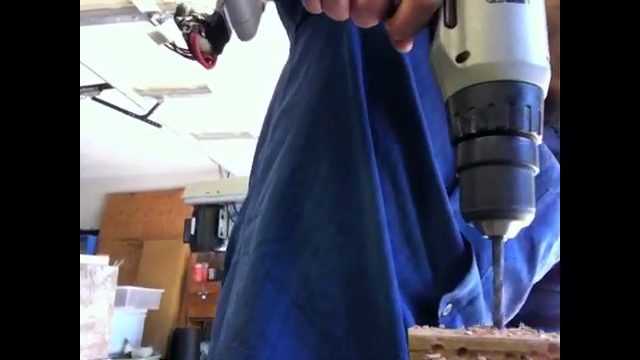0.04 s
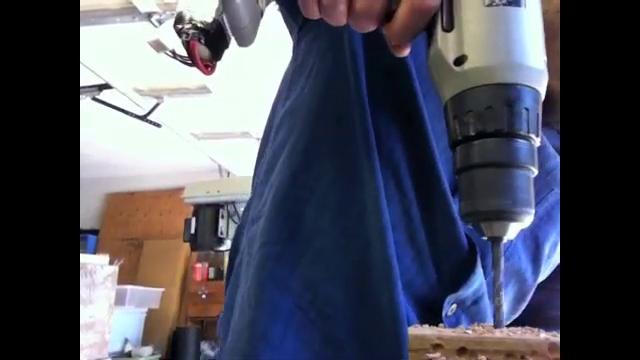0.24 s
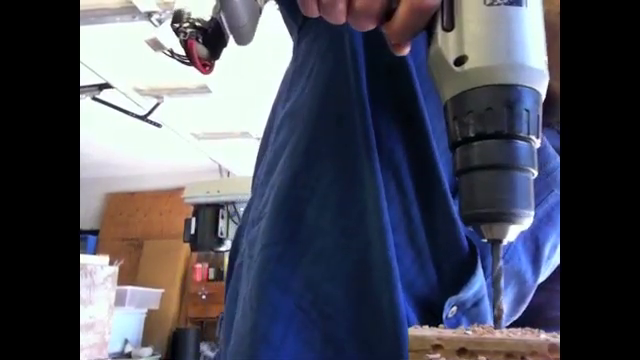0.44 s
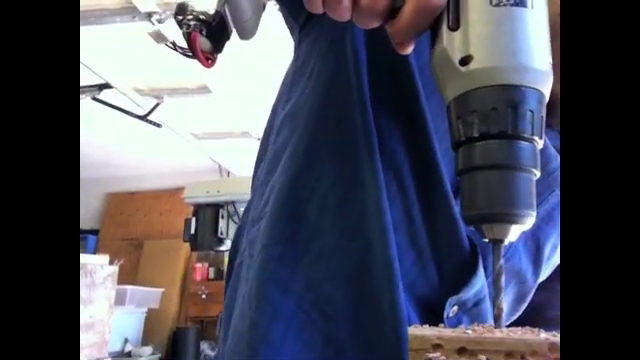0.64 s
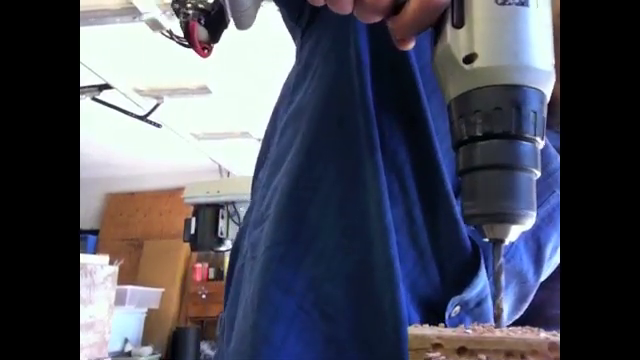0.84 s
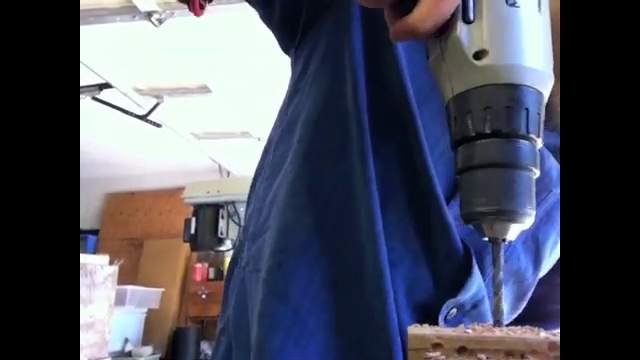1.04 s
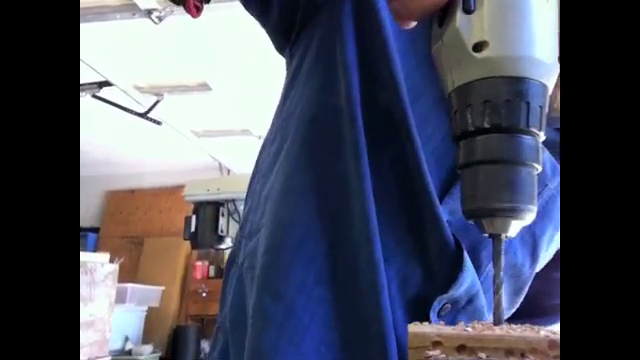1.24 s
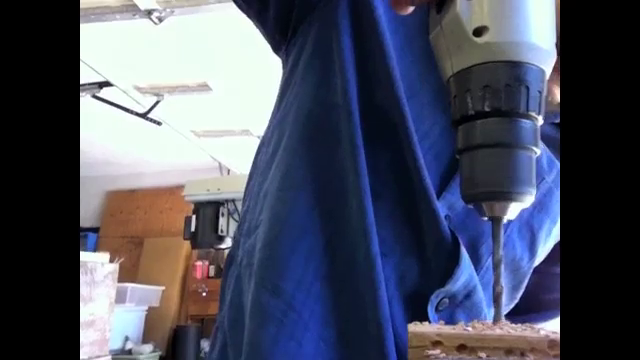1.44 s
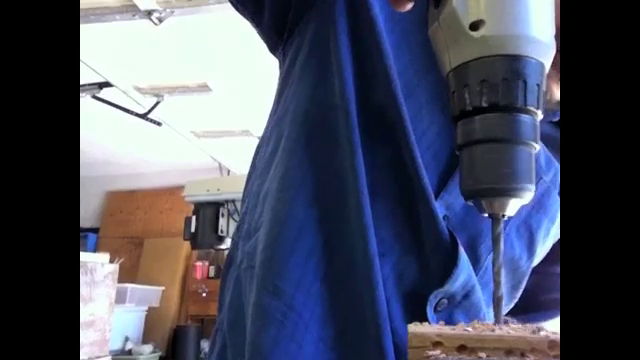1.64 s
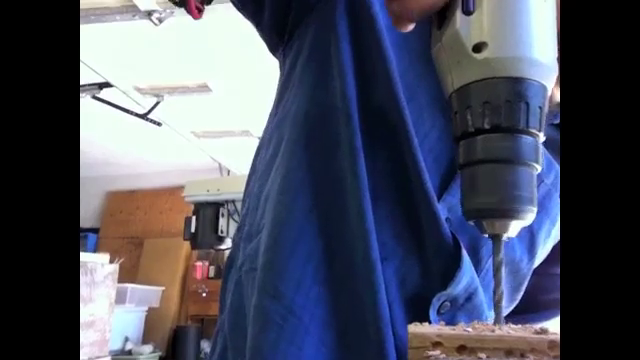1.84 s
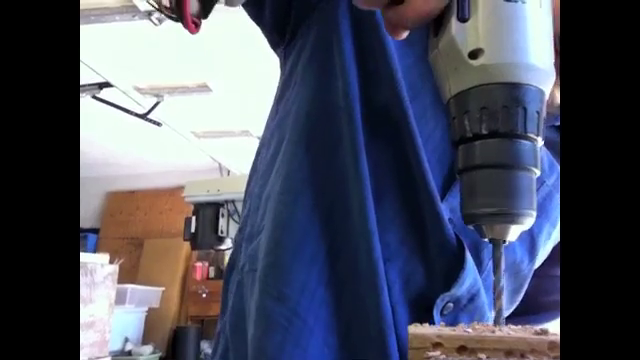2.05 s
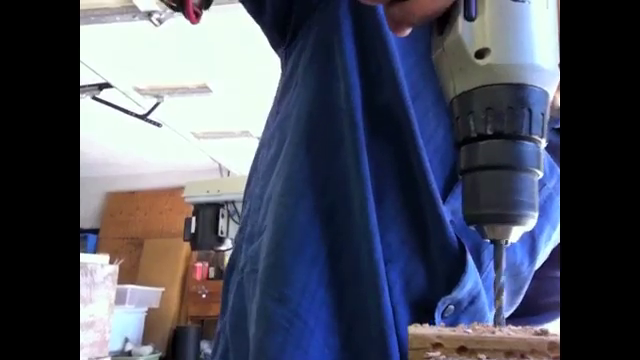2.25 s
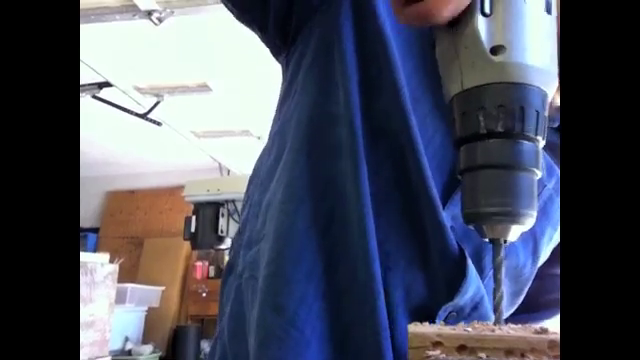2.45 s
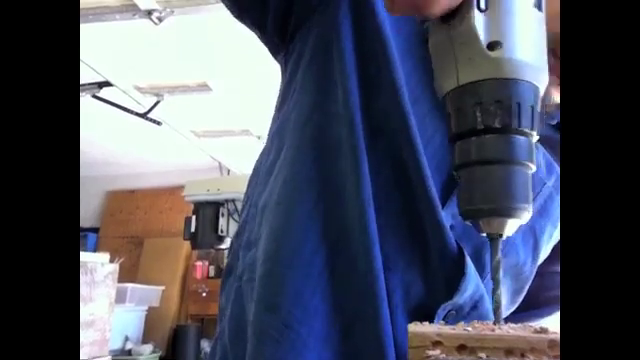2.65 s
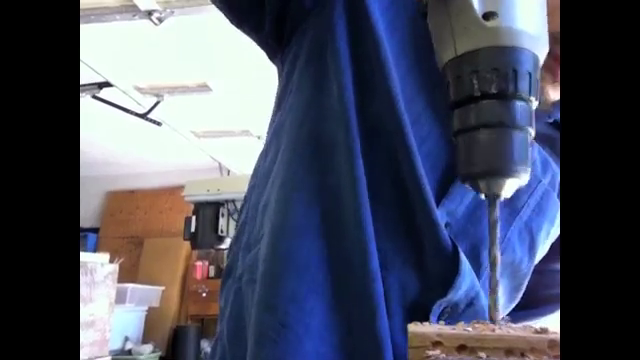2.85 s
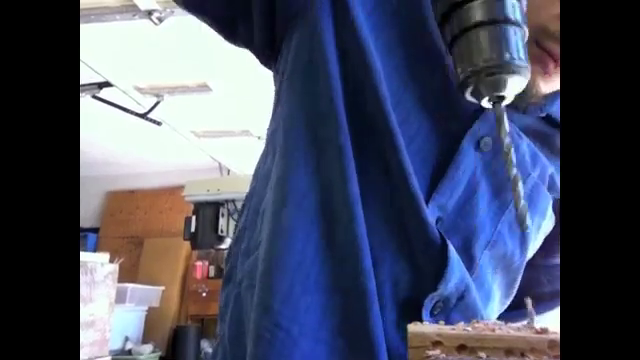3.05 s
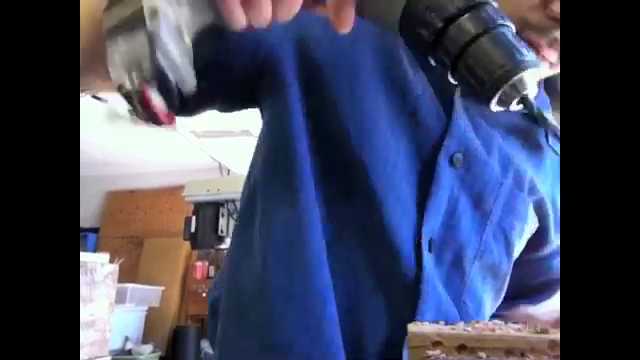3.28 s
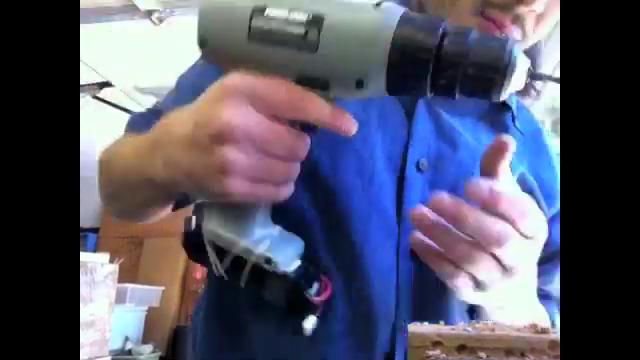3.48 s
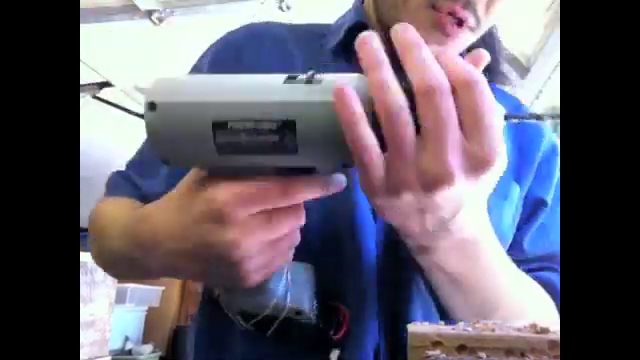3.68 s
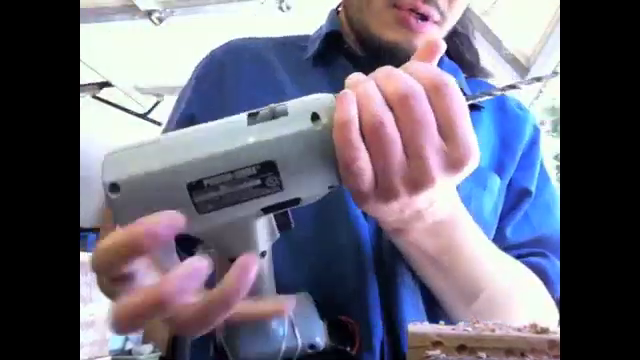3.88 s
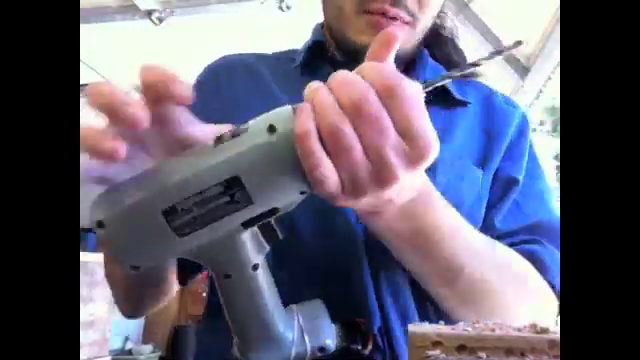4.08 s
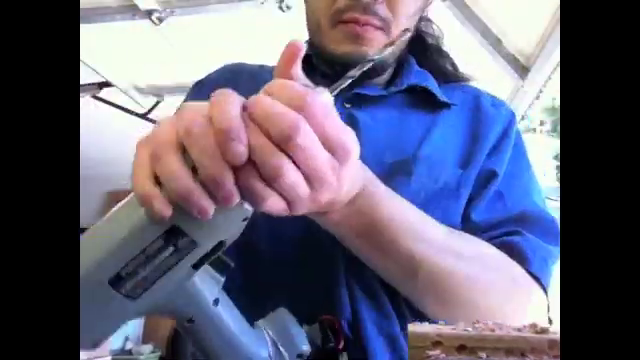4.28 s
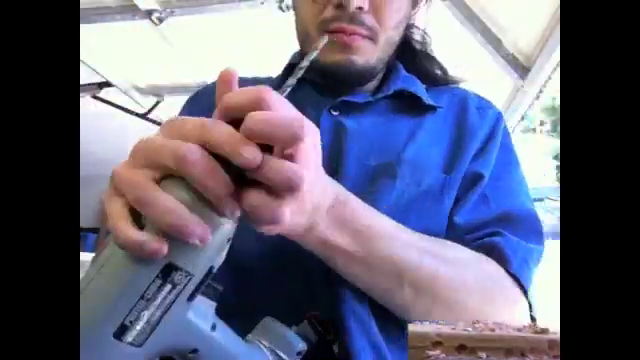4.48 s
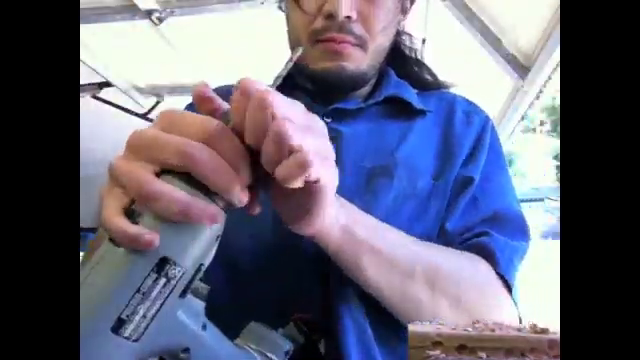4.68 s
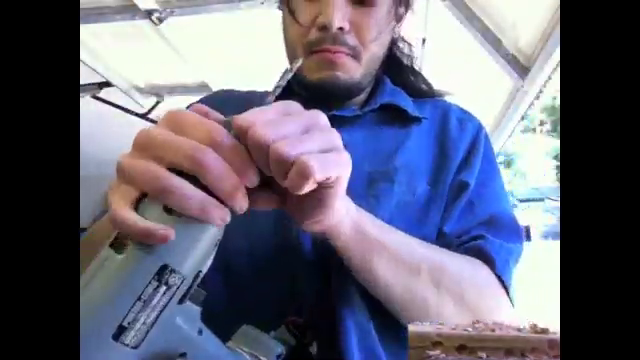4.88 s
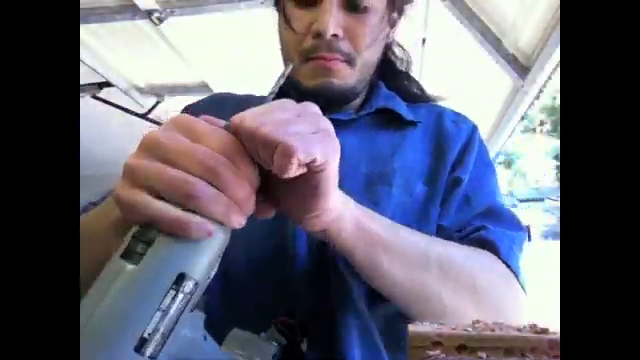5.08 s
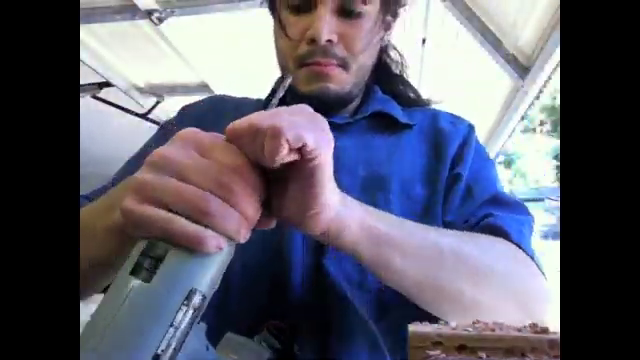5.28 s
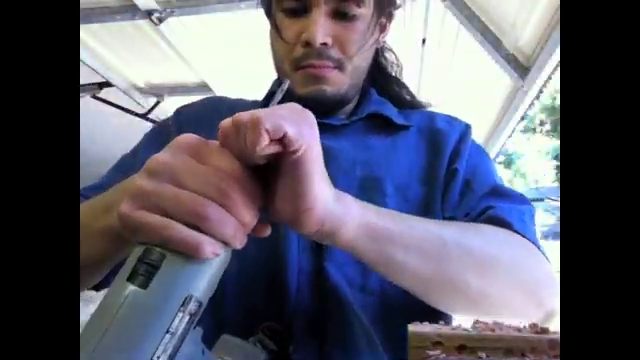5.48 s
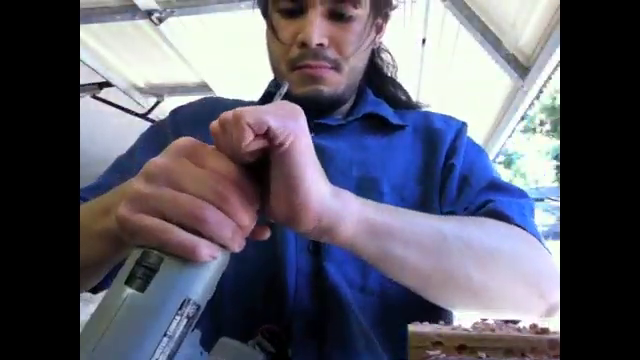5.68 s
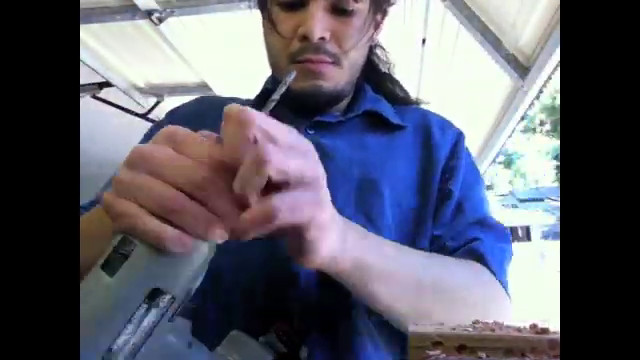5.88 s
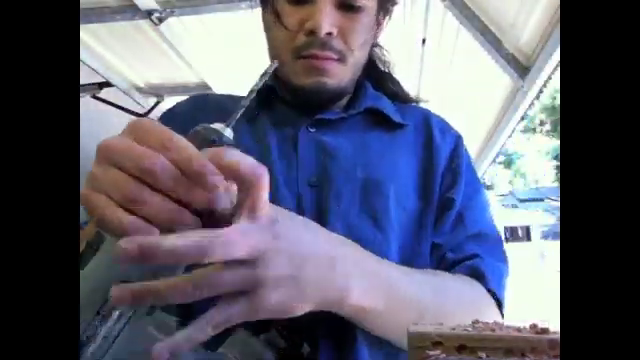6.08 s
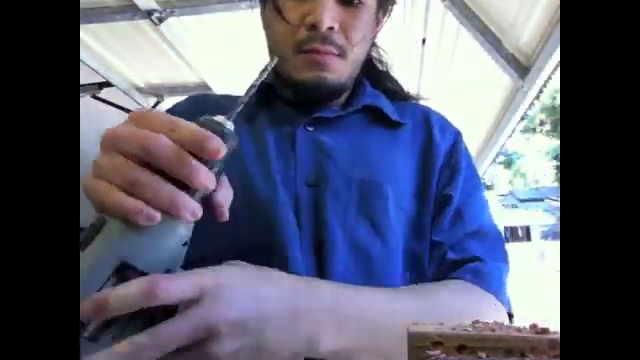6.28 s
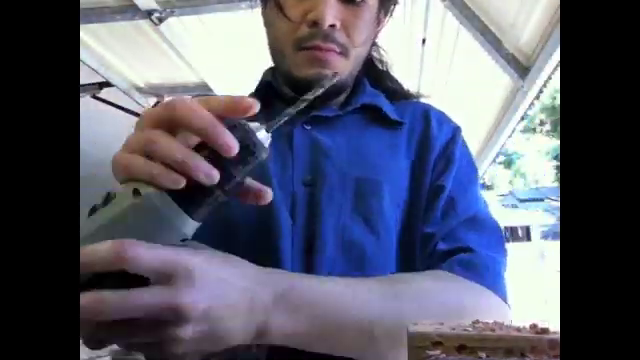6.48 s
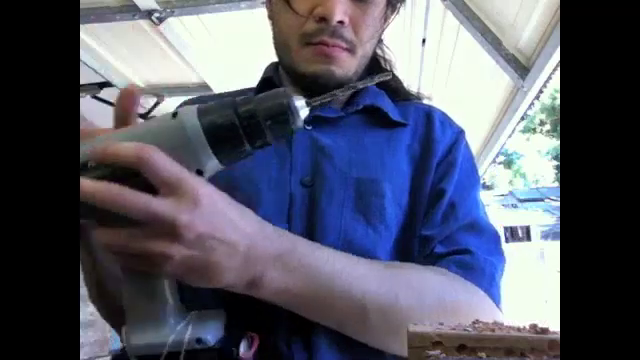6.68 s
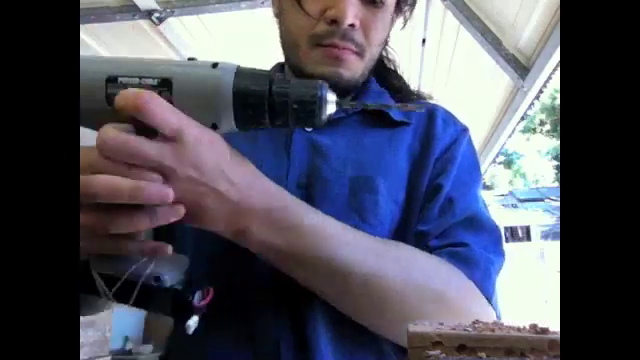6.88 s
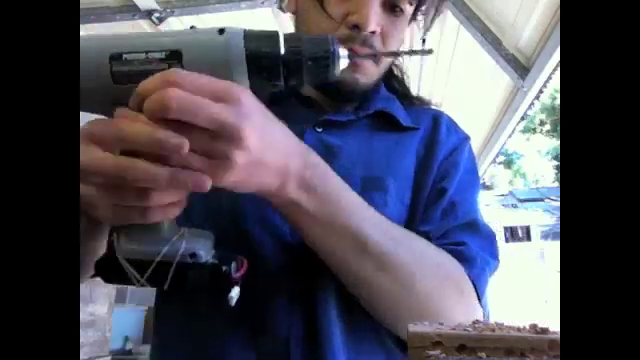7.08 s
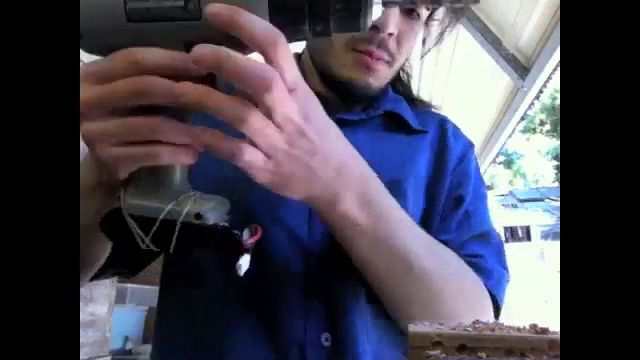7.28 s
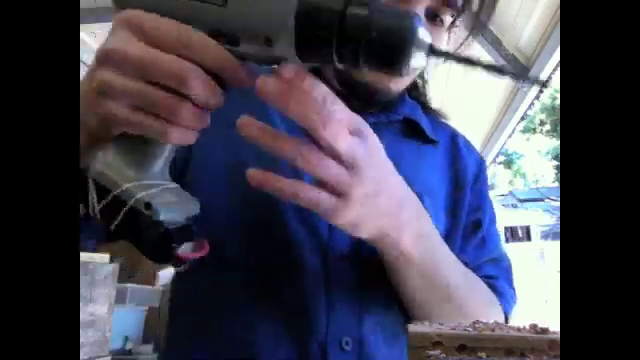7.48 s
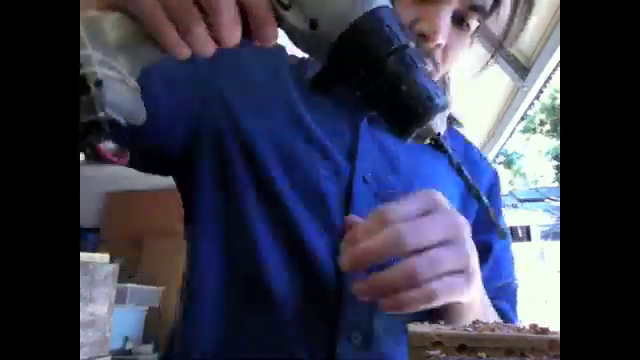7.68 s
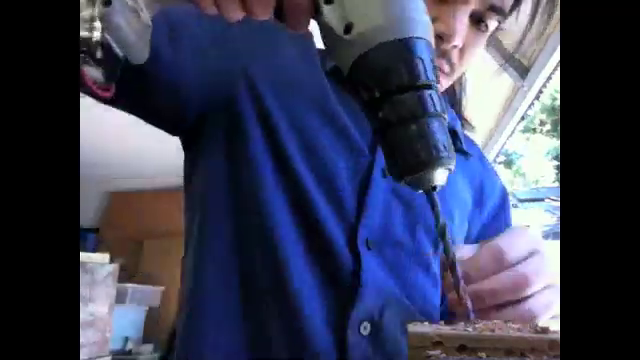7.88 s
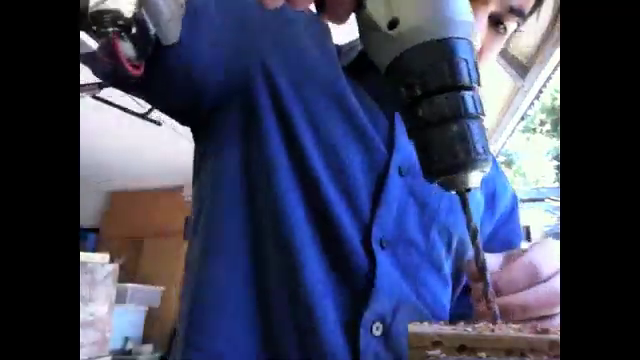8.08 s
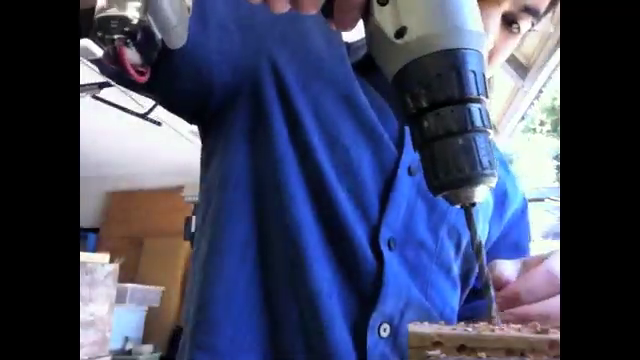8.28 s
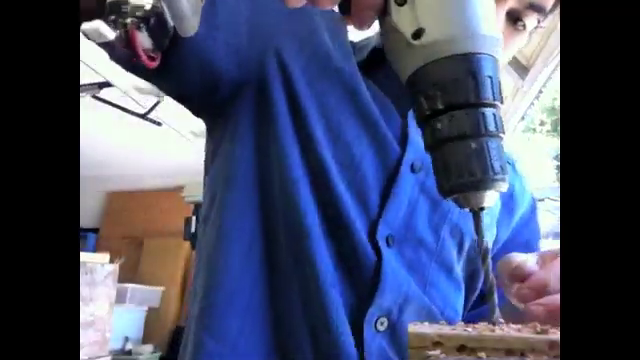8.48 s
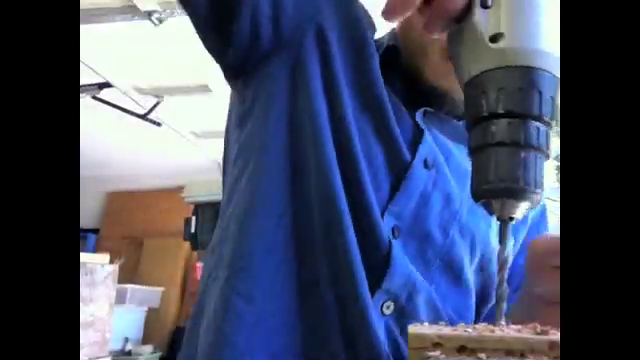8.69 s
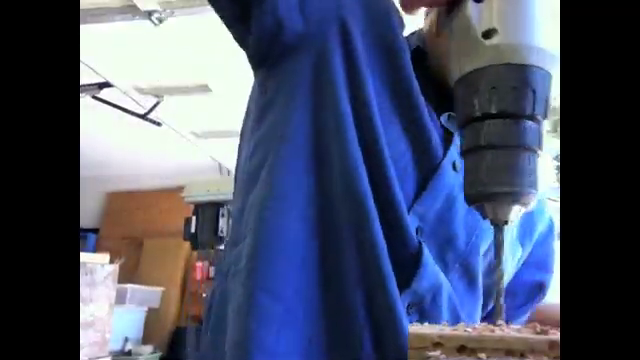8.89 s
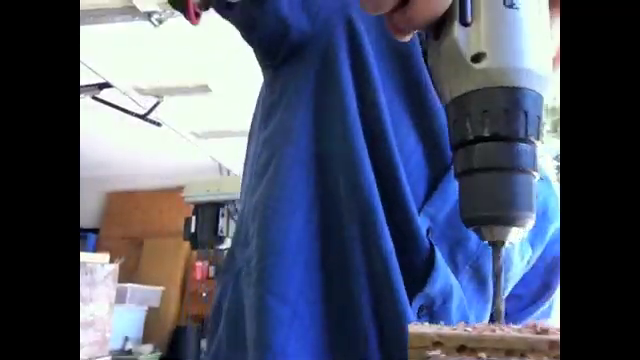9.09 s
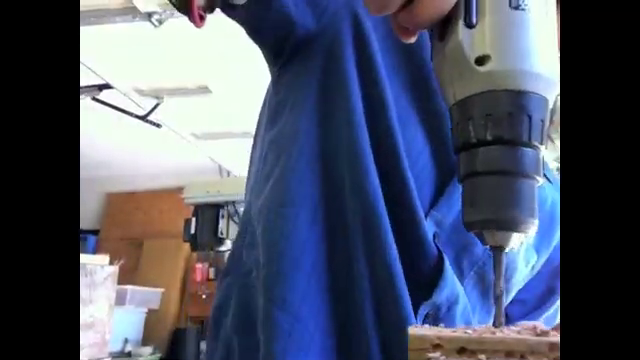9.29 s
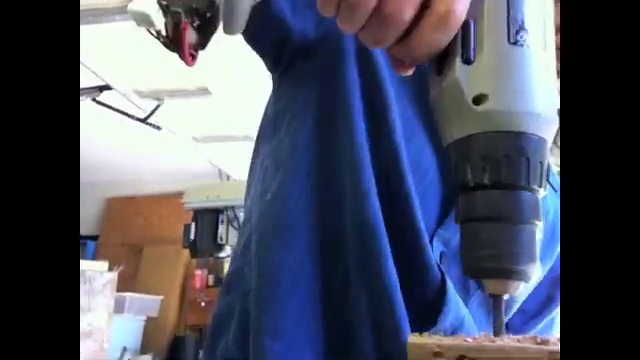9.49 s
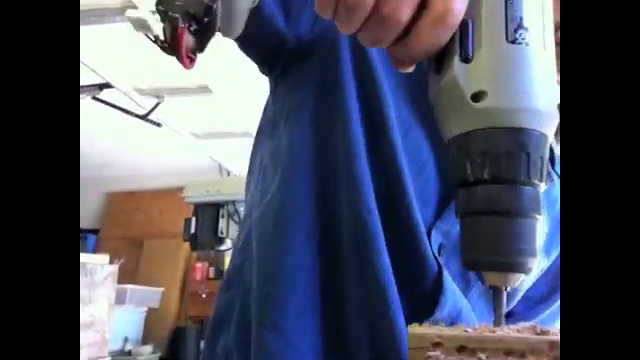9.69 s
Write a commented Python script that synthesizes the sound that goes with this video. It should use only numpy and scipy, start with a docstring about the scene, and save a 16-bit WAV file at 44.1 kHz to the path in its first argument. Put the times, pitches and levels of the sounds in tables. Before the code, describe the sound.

A cordless drill whines through wood, coasts to a stop, is handled with small clicks, then restarts with squeals and sharp cracks.

```python
"""A cordless drill bores into a wooden block, close by in a workshop. Tooth impacts and tones locked
to the shaft excite the resonances of its plastic casing, so the gearbox rattles and whines.
The trigger is eased, pulled again and let go, and the motor coasts down against drag and friction.
Hands turn the drill over; the casing clicks and the chuck clacks. Then it starts again: the bit
squeals by stick-slip friction and catches with a few sharp cracks that jolt the block on the bench."""
import sys
import numpy as np
from scipy import signal
from scipy.fft import rfft, irfft, next_fast_len
from scipy.io import wavfile
from scipy.ndimage import uniform_filter1d

SR = 44100
rng = np.random.default_rng(int(sys.argv[2]) if len(sys.argv) > 2 else 0)


def output_pcm(signal):
    """Save a mono or channel-first signal as 16-bit PCM at the path in sys.argv[1].

    Samples are clipped to [-1, 1] before scaling.
    """
    pcm = np.clip(np.atleast_2d(signal).T, -1, 1) * 32767
    wavfile.write(sys.argv[1], SR, np.round(pcm).astype(np.int16))


N = 429534
TIME = np.arange(N) / SR
FULL_SPEED_HZ = 278  # motor turns per second
CARRIER_RATIO = .2147  # turns of the planet carrier per motor turn
BITE_S = .035  # time for the bit to take hold or come free

# resonances and dips of the plastic casing: hz, width_hz, lift_db
CASING_MODES = [(602.5, 18, 6.5), (793, 150, 5), (995, 350, -2.5), (1116, 110, 5), (1424, 190, 8),
                (1805, 260, 4.5), (2340, 91, -0.5), (2610, 200, -4.5), (3220, 68, -3.5), (3530, 110, -5),
                (3670, 350, 3), (4640, 180, 6.5), (4680, 47, -9), (5900, 40, -2), (6047, 350, 5.5),
                (7240, 420, 3.5)]
# trigger pulls: pulled_s, let_go_s, spin_up_s (time constant), slack_ring_db
TRIGGER_PULLS = [(-1, .972, .06, 0), (1.344, 2.432, .042, -2), (8.955, 10.5, .055, 5)]
# speed that the motor settles to under power: time_s, speed_hz
DRIVEN_SPEED = [(0, 281), (.13, 278.3), (.98, 277.8), (1.45, 291), (1.55, 291), (1.78, 302), (2.05, 292),
                (2.2, 276), (2.45, 275.5), (9.1, 278), (9.25, 288), (9.4, 291), (9.52, 276), (9.6, 290),
                (9.73, 295)]
# load on the gears, relative to full load: time_s, load_db
GEAR_LOAD = [(0, -1), (.1, -0.5), (.9, -0.44), (1.05, -1), (1.3, -7.5), (1.46, -5), (1.75, -9.5), (1.9, -6),
             (2.2, -2), (2.56, -0.5), (2.62, -4), (2.72, -1.5), (3.3, -2), (9.02, -8), (9.15, -4),
             (9.44, -3), (9.56, -6), (9.74, -10)]
# the bit bites into the wood: start_s, end_s, depth (0-1), song_db, song_roughness (0-1), howl_db
CUTS = [(-1, 1.02, 1, -41.5, .2, -43), (2.17, 2.53, .85, -43.5, .6, -58)]


def from_db(db):
    """Decibels to amplitude ratio."""
    return np.exp(np.asarray(db) * (np.log(10) / 20))


def rms_one(x):
    """Normalisation to unit power."""
    return x / np.sqrt(np.mean(x ** 2) + 1e-20)


def in_time(curve):
    """Linear interpolation of (time_s, value) rows at every sample."""
    return np.interp(TIME, *np.transpose(curve))


def between(start_s, end_s, edge_s):
    """A soft-edged gate: 1 between two times, 0 outside."""
    return .5 * (np.tanh((TIME - start_s) / edge_s) - np.tanh((TIME - end_s) / edge_s))


def bell_curve(centre_s, half_width_s):
    """A Gaussian envelope, 10 dB down at half_width_s from its centre."""
    return from_db(-10 * np.minimum(((TIME - centre_s) / half_width_s) ** 2, 20))


def drift(rate_hz):
    """Random modulation of unit variance, with rate_hz new values a second."""
    knots = rng.standard_normal(N // 32)
    return np.interp(TIME * rate_hz, np.arange(len(knots)), knots * np.sqrt(1.5))


def filtered(x, hz, kind, order=2):
    """Butterworth low- or high-pass."""
    return signal.sosfilt(signal.butter(order, hz, kind, fs=SR, output="sos"), x)


def coloured(x, spectrum):
    """Spectral shaping by a curve of (hz, level_db) rows."""
    hz, db = np.transpose(spectrum)
    size = next_fast_len(N)
    bins_hz = np.maximum(np.fft.rfftfreq(size, 1 / SR), 1)
    gain = from_db(np.interp(np.log(bins_hz), np.log(hz), db))
    return irfft(rfft(x, size) * gain, size)[:N]


def resonate(x, modes):
    """Resonances and antiresonances in series, one peaking filter each."""
    for hz, width_hz, lift_db in modes:
        gain, half_width = from_db(lift_db / 2), np.pi * width_hz / SR
        tuning = -2 * np.cos(2 * np.pi * hz / SR)
        x = signal.lfilter([1 + half_width * gain, tuning, 1 - half_width * gain],
                           [1 + half_width / gain, tuning, 1 - half_width / gain], x + 1e-18)
    return x


def rough_tone(cycles, roughness, flutter_hz, waver_db):
    """Random modulation spreads a share of a tone's power, its roughness, into a narrow noise band."""
    phase = 2 * np.pi * (cycles % 1)
    steady = np.sqrt(2 * (1 - roughness)) * from_db(waver_db * drift(14))
    noise_band = drift(flutter_hz) * np.sin(phase) + drift(flutter_hz) * np.cos(phase)
    return steady * np.sin(phase) + np.sqrt(roughness) * noise_band


def motor_speed():
    """First-order lag: the motor nears its driven speed, then coasts against drag and dry friction."""
    drag_s, friction_hz = .65, 60  # friction brings the exponential decay to a full stop
    driven, speed = in_time(DRIVEN_SPEED), np.zeros(N)
    for pulled_s, let_go_s, spin_up_s, _ in TRIGGER_PULLS:
        lag = (driven - np.interp(pulled_s, TIME, speed)) * np.exp(-np.abs(TIME - pulled_s) / spin_up_s)
        speed = np.where(TIME > pulled_s, np.maximum(driven - lag, 0), speed)
        let_go_hz = np.interp(let_go_s, TIME, speed)
        coast = (let_go_hz + friction_hz) * np.exp(-np.abs(TIME - let_go_s) / drag_s) - friction_hz
        speed = np.where(TIME > let_go_s, np.maximum(coast, 0), speed)
    return speed


def worn_surface(turns, count):
    """Periodic excitation: an uneven surface returns on every turn, giving count equal harmonics."""
    harmonics = np.exp(2j * np.pi * rng.random(count))
    surface = rms_one(irfft(np.append(0, harmonics), 16384))
    return surface[(turns % 1 * len(surface)).astype(int)]


def tooth_force(turns):
    """Gear meshing: nine uneven impacts a turn, plus friction and wear, modulated by the carrier."""
    teeth = np.diff(np.floor(9 * turns + .15 * drift(900)), prepend=0) > 0
    blows = teeth * rng.choice([-1, 1], N) * from_db(5 * np.clip(rng.standard_normal(N), -2, 2))
    blows /= np.sqrt(np.maximum(uniform_filter1d(blows ** 2, size=4000), .08))  # even out the power
    friction = from_db(-1) * rng.standard_normal(N)
    wear = from_db(-7.5) * worn_surface(CARRIER_RATIO * turns, count=240)
    return (blows + friction + wear) * (1 + .098 * np.sin(2 * np.pi * CARRIER_RATIO * turns))


def casing_vibration(force):
    """Forced vibration: the teeth drive the casing, heard as low grind, middle rattle and high hiss."""
    # spectral envelope of the rattle: hz, level_db
    spectrum = [(59, -55), (100, -23), (140, -18.5), (308, -19.5), (492, -11), (991, -14), (1390, -10),
                (1580, -10), (2420, 3), (2690, 1), (7610, -8), (15000, -21), (16000, -32)]
    body = resonate(coloured(force, spectrum), CASING_MODES)
    grind = filtered(filtered(body, 110, "high"), 1090, "low", order=4)
    rattle = filtered(filtered(body, 1250, "high", order=4), 7200, "low", order=4)
    hiss = filtered(body, 7600, "high", order=4)
    return rms_one(grind), rms_one(rattle), rms_one(hiss)


def brush_hiss():
    """Sliding friction at the motor's brushes makes a high band of noise."""
    return rms_one(filtered(filtered(rng.standard_normal(N), 8000, "high"), 14000, "low", order=4))


def shaft_buzz(turns):
    """A harmonic series on the rotation rate, from surface wear, drives the casing."""
    harmonics = filtered(worn_surface(turns, count=22), 900, "high", order=1)
    return rms_one(resonate(harmonics, CASING_MODES))


def gear_whine(turns):
    """Tones locked to the shaft swell as they sweep through resonances; each cut shifts their balance."""
    # motor and gear tones: speed_multiple, roughness (0-1), first_cut_db, second_cut_db, free_db
    shaft_orders = [(1, .1, -36, -22, -37), (1.8, .15, -20, -24, -38), (2, .2, -24, -22, -22),
                    (2.8, .4, -26.5, -26, -33), (3.214, .35, -22, -19, -25), (4, .5, -20.5, -23, -32),
                    (4.21, .45, -22, -21.5, -29), (4.825, .2, -22, -16, -20), (5.19, .2, -26, -20.5, -25),
                    (6, .2, -32, -24, -19), (6.39, .3, -24.5, -30, -29), (7, .35, -23.5, -24, -33),
                    (8.02, .08, -26, -25, -16.5), (8.356, .25, -29, -31, -33), (8.571, .2, -28, -33, -35),
                    (8.785, .15, -21, -30, -31), (9, .1, -24, -36, -32), (9.77, .5, -22, -28, -28),
                    (10.17, .5, -23, -30, -30), (11.2, .5, -25, -28, -26), (12, .4, -24, -21, -22),
                    (13, .3, -32, -31, -20), (14.25, .5, -27, -22, -27), (15.83, .3, -23, -15.5, -27),
                    (16.15, .6, -26, -24, -25), (18.034, .3, -28, -15.5, -36), (18.7, .9, -22, -30, -28),
                    (27.12, .6, -19, -19, -33), (27.74, .5, -21, -26, -36)]
    # resonance of the ring gear: hz, width_hz, lift_db
    ring_gear = [(2305, 70, 9)]
    first, second = (between(start_s, end_s, BITE_S) for start_s, end_s, *_ in CUTS)
    tones = 0
    for multiple, roughness, first_db, second_db, free_db in shaft_orders:
        db = free_db + first * (first_db - free_db) + second * (second_db - free_db)
        tilt_db = 2.5 * np.log2(multiple / 7)
        tone = rough_tone(multiple * turns, roughness, flutter_hz=30 + 4 * multiple, waver_db=2.1)
        tones += from_db(db + tilt_db) * tone
    return resonate(tones, [*CASING_MODES, *ring_gear])


def gearbox_ring(force):
    """Modal resonance: tooth impacts ring the metal parts in uneven surges."""
    # modes of the gearbox and chuck: hz, width_hz, level_db
    metal_modes = [(566, 26, -10.5), (1417, 76, 2), (1780, 45, 3), (2303, 60, 4.5), (3060, 160, -2.5),
                   (3750, 130, 11.5), (3930, 300, 0)]
    ring = sum(from_db(db) * signal.lfilter(*signal.iirpeak(hz, hz / width_hz, fs=SR), force)
               for hz, width_hz, db in metal_modes)
    return from_db(3.5 * drift(35)) * rms_one(filtered(ring, 480, "high"))


def deep_cut_song(turns):
    """In a cut the planets amplitude-modulate a bearing tone and a gear howl, beside the mesh tone."""
    carrier_angle = 2 * np.pi * CARRIER_RATIO * turns
    mesh = from_db(-1.5) * rough_tone(9 * turns, roughness=.15, flutter_hz=66, waver_db=3)
    howl = rough_tone(8.9 * turns, roughness=1, flutter_hz=220, waver_db=1.5)
    howl *= 1 + .95 * np.cos(carrier_angle)
    out = 0
    for start_s, end_s, _, song_db, roughness, howl_db in CUTS:
        song = rough_tone(17.39 * turns, roughness, flutter_hz=500 * roughness, waver_db=1)
        song *= 1 + .3 * np.cos(3 * carrier_angle)  # three planet gears load the bearing in turn
        tones = from_db(song_db) * song + from_db(howl_db) * (howl + mesh)
        out += between(start_s, end_s, BITE_S) * tones
    return out


def bearing_screeches(turns):
    """Dry friction in the bearing gives short narrow-band cries that glide with the motor speed."""
    # screeches: centre_s, half_width_s, level_db, speed_multiple
    cries = [(1.042, 0.036, -31.5, 16.7), (1.138, 0.016, -35.5, 20.3), (1.191, .012, -43, 22.5),
             (1.42, 0.015, -36, 17.4), (1.49, 0.085, -38.5, 11.6), (1.97, 0.022, -38, 13.9),
             (2.493, 0.028, -31, 18.1), (2.535, 0.03, -33, 17.3), (2.585, 0.016, -36.5, 21.5)]
    return sum(from_db(db) * bell_curve(centre_s, half_width_s)
               * rough_tone(multiple * turns, roughness=1, flutter_hz=600, waver_db=1.5)
               for centre_s, half_width_s, db, multiple in cries)


def add(out, start_s, sound):
    """Superposition of a short sound from start_s on."""
    at = round(start_s * SR)
    out[at:at + len(sound)] += sound[:max(N - at, 0)]


def knocks(contacts, body_modes, body_share, low_hz, attack_s, ring_db, gain_db):
    """Impact excitation: a decaying noise burst rings the struck part and the body around it."""
    out, t = np.zeros(N), np.arange(SR // 5) / SR
    modes = [(hz, width_hz, body_share * lift_db) for hz, width_hz, lift_db in body_modes]
    for start_s, level_db, lowpass_hz, ring_hz, t60_s in contacts:
        burst = rng.standard_normal(len(t)) * from_db(-60 * t / t60_s) * (1 - np.exp(-t / attack_s))
        burst = filtered(burst, lowpass_hz, "low", order=1)
        burst = filtered(burst, min(low_hz, .5 * ring_hz), "high")
        burst = resonate(burst, [*modes, (ring_hz, ring_hz / 7, ring_db)])
        add(out, start_s, from_db(level_db + gain_db) * rms_one(burst) * np.sqrt(t60_s))
    return out


def trigger_snaps():
    """Hard impacts: the switch snaps and the gears take up their backlash."""
    # snaps: start_s, level_db, lowpass_hz, ring_hz, t60_s
    contacts = [(1.298, -31, 14000, 8500, .015), (8.932, -32.5, 5000, 2100, 0.033),
                (8.939, -33, 6000, 3880, .025), (8.968, -10.5, 2800, 1920, 0.012)]
    return knocks(contacts, CASING_MODES, body_share=.4, low_hz=1000,
                  attack_s=.00026, ring_db=6, gain_db=-11)


def controller_whistle(speed_hz, cutting):
    """A fixed-frequency tone of the speed controller: rougher with speed, fading in a deep cut."""
    # spells of part throttle: start_s, end_s
    part_throttle = [(1.303, 2.432), (8.946, 10.5)]
    on = sum(between(start_s, end_s, edge_s=.005) for start_s, end_s in part_throttle)
    gain = from_db(-43.5 + .89 * in_time(GEAR_LOAD)) * on * (1 - cutting)
    roughness = .3 + .49 * speed_hz / FULL_SPEED_HZ
    return gain * rough_tone(3078 * TIME, roughness, flutter_hz=118.7, waver_db=1.5)


def chuck_chatter():
    """The chuck rasps in bursts of narrow-band noise as the motor gathers speed."""
    # rasps: centre_s, half_width_s, level_db, pitch_hz
    rasps = [(1.388, 0.02, -38, 3780), (9.005, .014, -37, 3860), (9.062, 0.03, -33, 3880),
             (9.138, 0.037, -38, 4160), (9.212, .03, -37, 3800)]
    return sum(from_db(db) * bell_curve(centre_s, half_width_s)
               * rough_tone(hz * TIME, roughness=1, flutter_hz=457, waver_db=1)
               for centre_s, half_width_s, db, hz in rasps)


def bit_squeals():
    """Stick-slip oscillation: the bit sings against the wall of the hole for a few milliseconds."""
    # squeals: peak_s, level_db, pitch_hz, length_s
    squeals = [(1.4743, -17.5, 11480, .004), (1.48, -40, 11400, .005), (2.077, -39, 9000, .009),
               (9.288, -27, 13450, 0.0037), (9.2958, -16.5, 9080, 0.004), (9.3005, -18, 9000, .005),
               (9.312, -31, 8900, .005), (9.322, -31, 13400, .006), (9.331, -26.5, 9500, 0.0092),
               (9.365, -21, 9300, .004), (9.371, -13, 9400, .007), (9.377, -8.5, 9490, 0.0037),
               (9.3865, -21, 9350, .004), (9.396, -21, 13300, 0.0049), (9.404, -27, 9750, 0.0096),
               (9.6085, -22.5, 6700, .005), (9.6365, -28, 6780, .007), (9.643, -28, 6780, 0.009),
               (9.696, -22.5, 6970, 0.01), (9.7325, -18.5, 6770, .0045)]
    out, t = np.zeros(N), np.arange(-SR // 32, SR // 16) / SR
    waver = .0091 * drift(500)
    grip = from_db(1.1 * np.clip(drift(300), -1.5, 1.5))
    for peak_s, level_db, pitch_hz, length_s in squeals:
        swell = 1 / np.cosh(2 * t / (length_s * np.where(t < 0, .5, 1)))  # rises faster than it fades
        sag = .0059 * (1 - swell)  # flatter when quiet
        hz = pitch_hz * (1 - sag + np.interp(peak_s + t, TIME, waver))
        tone = np.sqrt(2) * np.sin(2 * np.pi * np.cumsum(hz) / SR)
        add(out, peak_s + t[0], from_db(level_db) * swell * tone)
    return out * grip


def hand_rubs():
    """Friction noise: skin and cloth move over the plastic in small uneven slips."""
    # slides of the hands: start_s, length_s, level_db
    slides = [(3.758, 0.36, -62), (4.16, 0.095, -64), (4.349, 0.076, -65.5), (4.488, 0.43, -70),
              (5.9, 0.2, -71.5), (6.364, 0.34, -69.5), (6.886, 0.46, -67.5), (7.023, 0.076, -62),
              (7.424, 0.24, -67), (8.424, 0.78, -77)]
    # spectral envelope of the rubbing: hz, level_db
    spectrum = [(500, -3.5), (1200, 1), (1900, -0.5), (3000, -6), (4500, -3), (7000, -5), (10000, -12.5),
                (15000, -16)]
    edge_s, fade_db = .026, 4.5
    slips = rng.standard_normal(N) * from_db(2.5 * drift(100))
    envelope = from_db(-77.5) * between(1.7, 7.8, edge_s)  # faint rustle of holding the drill
    for start_s, length_s, db in slides:
        progress = np.clip((TIME - start_s) / length_s, 0, 1)
        slide = from_db(db - fade_db * progress) * between(start_s, start_s + length_s, edge_s)
        envelope = np.maximum(envelope, slide)
    return envelope * rms_one(coloured(slips, spectrum))


def slack_clatter(turns):
    """Backlash: unloaded gears knock about five times a turn, so the ticks thin out as the motor slows."""
    # resonances of the slack gears: hz, width_hz, lift_db
    slack_modes = [(1928, 300, 10.5), (2600, 200, 8.5), (3050, 190, 8.5), (6250, 250, 8), (6700, 180, 10.5),
                   (7600, 400, 5)]
    ticks = np.diff(np.floor(5 * turns + .25 * drift(200)), prepend=0) > 0
    blows = ticks * rng.choice([-1, 1], N) * from_db(3 * np.clip(rng.standard_normal(N), -2, 1.5))
    return rms_one(filtered(filtered(resonate(blows, slack_modes), 1600, "high"), 8500, "low"))


def drill():
    """Machine noise: one shaft times the running parts, whose levels are power laws of speed and load."""
    # level laws: full_db, db_per_speed_db, db_per_load_db, deep_cut_db, slow_coast_db
    grind_law = (-45, 0.97, 1.03, 0.5, -0.5)
    rattle_law = (-35, 2, 1, 0.57, -2.5)
    hiss_law = (-39, 1.9, 1.2, -1.9, -4.5)
    brush_law = (-52.5, 0.8, 1, -2, 4)
    buzz_law = (-43.5, 1, 1.5, -9.5, -5)
    whine_law = (-32.5, 1.9, .65, 3.5, -4)
    ring_law = (-41.5, 1, 1.5, -10, 1)
    speed_hz = motor_speed()
    speed_db = 20 * np.log10(speed_hz / FULL_SPEED_HZ + 1e-4)
    turns = np.cumsum(speed_hz * (1 + .0012 * drift(25))) / SR
    powered = sum(between(on_s, off_s, edge_s=.005) for on_s, off_s, _, _ in TRIGGER_PULLS)
    spin_up_load_db = 11 * powered * (1 - speed_hz / in_time(DRIVEN_SPEED))
    load_db = in_time(GEAR_LOAD) + spin_up_load_db
    cutting = sum(depth * between(start_s, end_s, BITE_S) for start_s, end_s, depth, *_ in CUTS)
    coasting = (1 - powered) * .5 * (1 + np.tanh((160 - speed_hz) / 10))  # gears run slack below 160 Hz

    def level(law):
        full_db, by_speed, by_load, cut_db, coast_db = law
        running_db = full_db + by_speed * speed_db + by_load * load_db
        return from_db(running_db + cut_db * cutting + coast_db * coasting)

    force = tooth_force(turns)
    grind, rattle, hiss = casing_vibration(force)
    casing = level(grind_law) * grind + level(rattle_law) * rattle + level(hiss_law) * hiss
    brushes = level(brush_law) * brush_hiss()
    buzz = level(buzz_law) * shaft_buzz(turns)
    whine = level(whine_law) * from_db(-5 * (1 - powered)) * gear_whine(turns)
    slack_db = sum(db * between(on_s, off_s, BITE_S) for on_s, off_s, _, db in TRIGGER_PULLS)
    shake_db = 1.5 * np.exp(-((speed_hz - 241) / 30) ** 2)  # the shaft passes its critical speed
    throb = 1 + .25 * coasting * np.cos(2 * np.pi * CARRIER_RATIO * turns)
    ring = throb * level(ring_law) * from_db(slack_db + shake_db) * gearbox_ring(force)
    clatter = coasting * from_db(-44 + .8 * speed_db + load_db) * slack_clatter(turns)
    whistles = controller_whistle(speed_hz, cutting) + bearing_screeches(turns) + deep_cut_song(turns)
    return casing + brushes + buzz + whine + ring + clatter + whistles + chuck_chatter()


def casing_clicks():
    """Light impacts excite the casing's modes as the hands turn the drill over."""
    # clicks: start_s, level_db, lowpass_hz, ring_hz, t60_s
    contacts = [(3.692, -24, 7000, 4830, 0.025), (3.985, -47, 4000, 1610, 0.018),
                (4.53, -43, 7050, 2580, 0.019), (4.65, -48.5, 3000, 2500, 0.019),
                (5.05, -50, 3022, 2300, 0.013), (6.947, -43, 4000, 1820, 0.03),
                (7.15, -35, 2000, 1020, 0.028), (7.331, -40.5, 1600, 1240, 0.012),
                (7.494, -39.5, 4030, 4200, 0.077), (7.588, -39, 5000, 2100, 0.019),
                (8.53, -48.5, 3010, 2000, 0.026), (8.764, -41, 2500, 3720, 0.059)]
    clicks = knocks(contacts, CASING_MODES, body_share=.85, low_hz=960,
                    attack_s=.0011, ring_db=12, gain_db=-12)
    return filtered(clicks, 6100, "low")


def chuck_clacks():
    """Impacts excite the chuck's own modes as it is twisted."""
    # clacks: start_s, level_db, lowpass_hz, ring_hz, t60_s
    contacts = [(6.4595, -24.5, 3500, 1500, 0.021), (6.4885, -17, 5060, 2640, 0.023),
                (6.497, -38, 7000, 6750, 0.05), (6.5435, -24, 1800, 1380, 0.011),
                (6.5752, -29.5, 2500, 4600, 0.034)]
    # resonances and dips of the chuck: hz, width_hz, lift_db
    chuck_modes = [(1500, 520, 12), (2000, 200, -8), (2620, 420, 8.5), (2970, 250, -8), (3380, 200, 10),
                   (3700, 150, -3), (4020, 260, 15), (4730, 180, 13), (5820, 90, 13), (6740, 270, 11),
                   (7300, 400, 9)]
    clacks = knocks(contacts, chuck_modes, body_share=1, low_hz=1200,
                    attack_s=.0011, ring_db=5, gain_db=-12.5)
    return filtered(filtered(clacks, 790, "high"), 7000, "low")


def bit_catches():
    """Abrupt impulses have broad spectra: the bit catches in the wood with sharp cracks."""
    # cracks: start_s, level_db, lowpass_hz, ring_hz, t60_s
    contacts = [(9.434, -11, 12100, 4600, 0.032), (9.4875, -10.5, 7000, 6800, 0.049),
                (9.514, -3.5, 7040, 3530, 0.029)]
    cracks = knocks(contacts, CASING_MODES, body_share=.11, low_hz=1760,
                    attack_s=.00016, ring_db=6, gain_db=-11)
    return filtered(cracks, 11000, "low", order=1)


def bench_thuds():
    """Damped free vibration: the block jolts the bench, whose low modes ring briefly."""
    # modes of the bench: hz, level_db, t60_s
    bench_modes = [(128, -1.5, 0.1), (167, -2.5, 0.1), (220, 2, 0.056), (323, -1.5, 0.063), (464, 4, 0.031)]
    # jolts of the block: start_s, level_db
    jolts = [(9.489, -33), (9.5065, -28), (9.514, -33.5), (9.566, -36), (9.583, -38)]
    out, t = np.zeros(N), np.arange(SR // 2) / SR
    ring = sum(from_db(db - 60 * t / t60_s) * np.sin(2 * np.pi * hz * t) for hz, db, t60_s in bench_modes)
    for start_s, level_db in jolts:
        add(out, start_s, from_db(level_db - 6) * ring)
    return filtered(out, 118, "high", order=3)


def workshop(direct, t60_s, wet_db, wall_hz):
    """Reverberation: walls and roof add a weak diffuse tail, over steady background noise."""
    # spectral envelope of the background: hz, level_db
    spectrum = [(15, -76), (25, -34.5), (80, -20), (114, -9.5), (185, -8.5), (212, -3.5), (256, -9),
                (373, -8.5), (405, -1.5), (516, -11.5), (863, -13), (1070, -17.5), (2280, -25.5),
                (2910, -30.5), (16000, -36.5)]
    # resonances and dips in the background: hz, width_hz, lift_db
    room_modes = [(144.5, 26, 7.5), (238.5, 6.3, 2.5), (316.7, 37, -3.5), (387, 43, -1.5), (575, 73.3, 7.5),
                  (846, 161, 5.5)]
    background = from_db(-62.5) * rms_one(resonate(coloured(rng.standard_normal(N), spectrum), room_modes))
    t = np.arange(SR // 2) / SR
    tail = filtered(rng.standard_normal(len(t)), wall_hz, "low", order=1)
    tail *= from_db(-60 * t / t60_s) * (t > .004)
    reflections = signal.fftconvolve(direct, tail / np.linalg.norm(tail))[:N]
    return direct + from_db(wet_db) * reflections + background


def scene():
    """Superposition of drill, handling and room at one listening point."""
    impacts = casing_clicks() + chuck_clacks() + bit_catches() + trigger_snaps() + bench_thuds()
    direct = impacts + drill() + bit_squeals() + hand_rubs()
    mono = workshop(direct, t60_s=.24, wet_db=-16, wall_hz=4990)
    return np.array([mono, mono])


def record(dry):
    """Band limiting: a steep elliptic low-pass removes the treble above 15.9 kHz."""
    return signal.sosfilt(signal.ellip(10, .1, 80, 15900, fs=SR, output="sos"), dry)


dry = scene()
out = record(dry)
output_pcm(out)
```